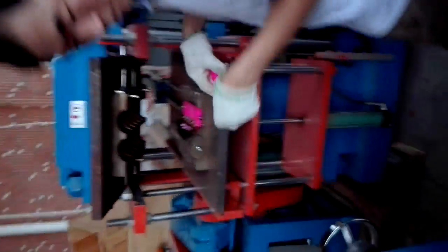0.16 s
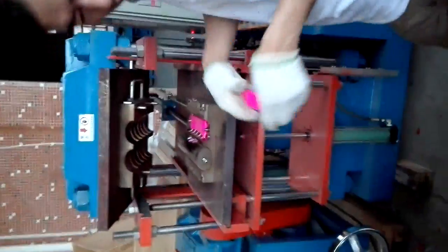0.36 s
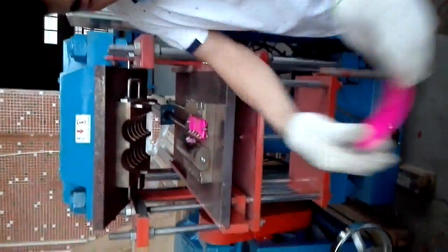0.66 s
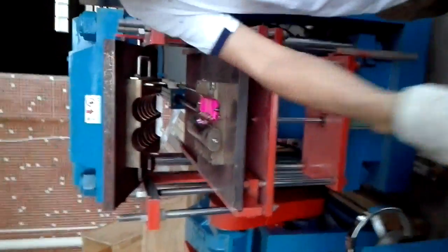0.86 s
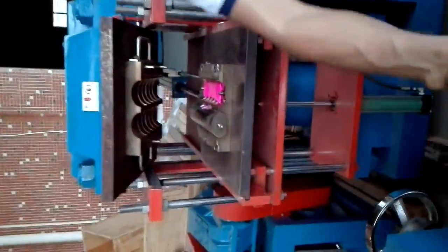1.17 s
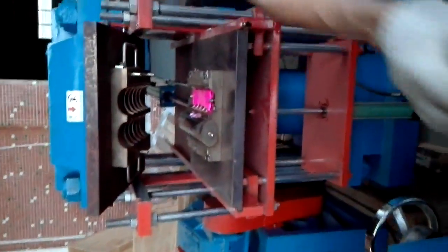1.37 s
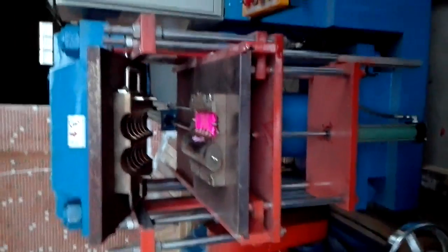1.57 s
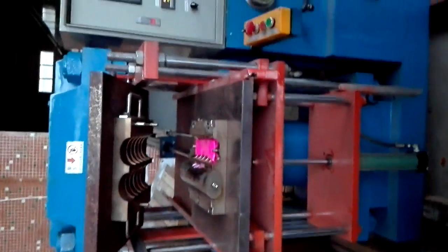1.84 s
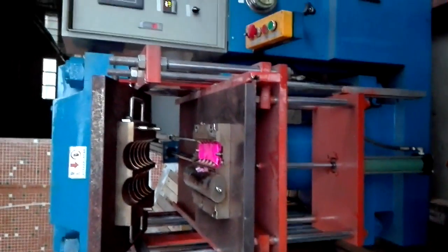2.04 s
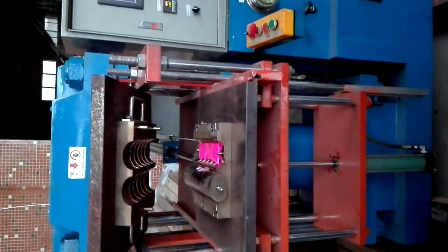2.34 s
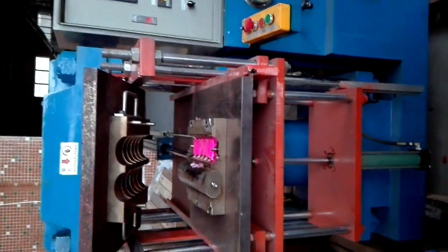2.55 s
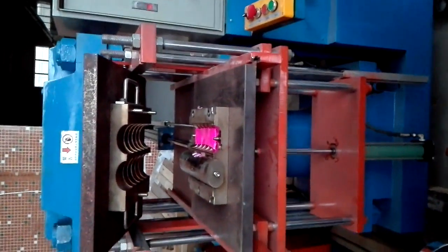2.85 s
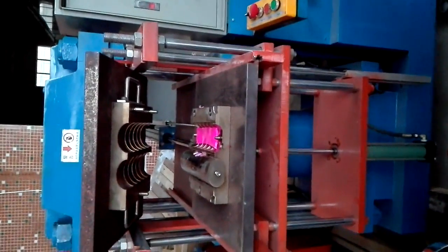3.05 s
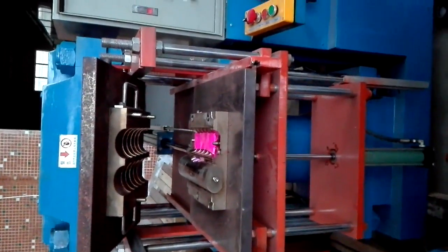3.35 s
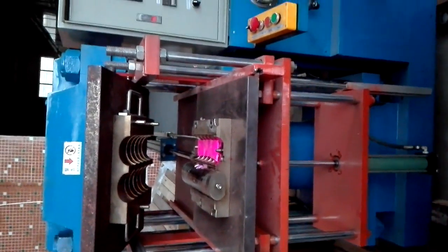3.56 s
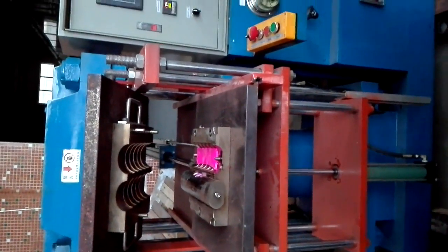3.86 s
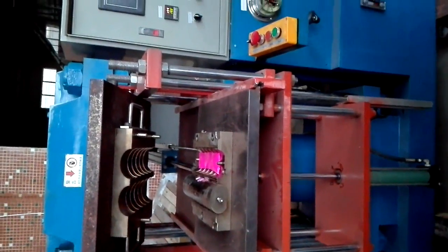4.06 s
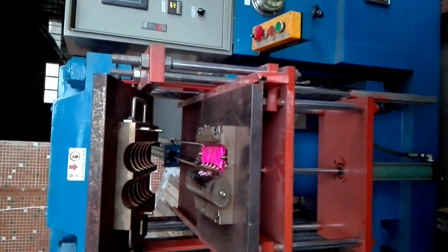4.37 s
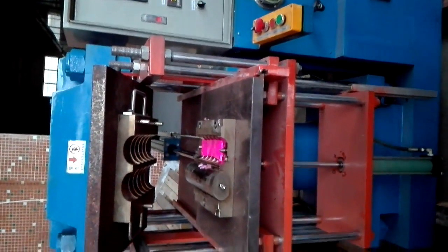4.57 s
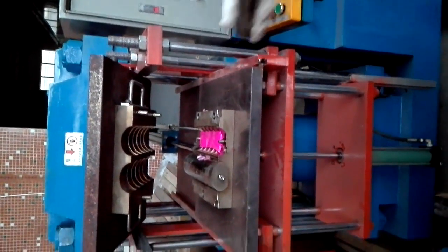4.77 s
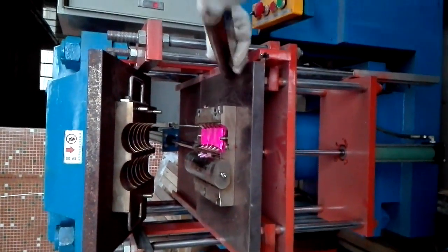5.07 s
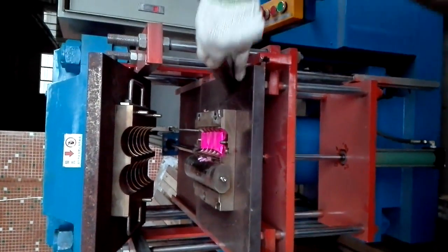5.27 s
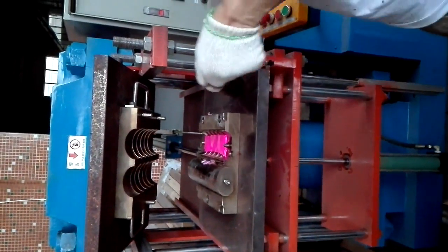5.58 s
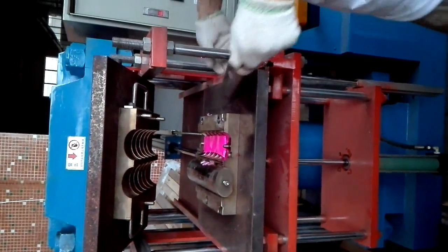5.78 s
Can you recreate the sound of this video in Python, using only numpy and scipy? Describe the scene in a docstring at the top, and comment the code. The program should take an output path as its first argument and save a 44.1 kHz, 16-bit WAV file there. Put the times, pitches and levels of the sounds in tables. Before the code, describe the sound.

Close handheld capture beside a press in a reverberant workshop: deep hum and dull air, faint handling clicks, a low rubbery bump, then one dominant steel clatter with several rapid contacts ringing about half a second. Afterwards a light tap, soft scuffs and two duller knocks, the last with a bright tick.

```python
"""Factory hall: a worker handles the steel parts of a press mould while a motor hums.
A heavy piece lands flat with a clang: steel and bench modes, noise-burst cracks and clatter.
Light knocks and a footfall (noise bursts), soft scuffs (gated noise) and a hollow bump (decaying
low sines) surround it; a hiss hangs on after the clang. Blows die away in hall echoes; motor lines,
whines and air run underneath."""
import sys
import numpy as np
from scipy import signal
from scipy.fft import rfft, irfft, next_fast_len
from scipy.io import wavfile
from scipy.ndimage import map_coordinates

SR = 44100
rng = np.random.default_rng(int(sys.argv[2]) if len(sys.argv) > 2 else 0)


def store_pcm(level_fs):
    """Save levels as 16-bit WAV."""
    pcm = np.round(np.clip(level_fs, -1, 1) * 32767).astype(np.int16)
    wavfile.write(sys.argv[1], SR, np.atleast_2d(pcm).T)


N = 260939
TIME = np.arange(N) / SR


def from_db(db):
    """Decibels to gain."""
    return 10 ** (np.asarray(db) / 20)


def rms_one(x):
    """Scale to rms 1."""
    return x / np.sqrt(np.mean(x ** 2) + 1e-20)


def at_hz(points, hz):
    """Read a curve on a log-frequency axis."""
    point_hz, value = np.transpose(points)
    return np.interp(np.log(hz), np.log(point_hz), value)


# left-right likeness: freq_hz, likeness_0_to_1
LIKENESS = [(3500, 1), (4500, .96), (6000, .79), (9000, .66), (13000, .85)]


def noise(spectrum, size=N):
    """Stereo noise of a given colour, alike in both channels except in the treble; rms 1."""
    length = next_fast_len(size, True)
    hz = np.maximum(np.fft.rfftfreq(length, 1 / SR), 1)
    mid, side = rfft(rng.standard_normal((2, length)))
    alike = np.clip(at_hz(LIKENESS, hz), 0, 1)
    both = np.sqrt(1 + alike) * mid + np.sqrt(1 - alike) * side * [[1], [-1]]
    coloured = both * from_db(at_hz(spectrum, hz))
    return rms_one(irfft(coloured, length)[:, :size])


def drift(turns_per_s):
    """Smooth random curve through about `turns_per_s` random knots a second; rms 1."""
    knots = rng.standard_normal(1024)
    coarse_s = TIME[::64]
    curve = map_coordinates(knots, [coarse_s * turns_per_s], mode="wrap")
    return rms_one(np.interp(TIME, coarse_s, curve))


def soften(x, cut_hz):
    """First-order low-pass: a softer contact carries less treble."""
    low_pass = signal.butter(1, min(cut_hz, .45 * SR), fs=SR, output="sos")
    return signal.sosfilt(low_pass, x)


def fade(rise_s, t60_s):
    """One second of a build-up and an exponential decay."""
    t = TIME[:SR]
    return (1 - np.exp(-t / rise_s)) * np.exp(-np.log(1000) * t / t60_s)


def burst(spectrum, rise_s, t60_s):
    """A crowd of short-lived modes struck at once, as decaying noise."""
    return noise(spectrum, size=SR) * fade(rise_s, t60_s)


def ringing(modes, scatter_db):
    """Sum of decaying modes; each blow draws new phases and scatters the levels by scatter_db."""
    t = TIME[:SR]
    out = np.zeros(SR)
    for hz, db, t60_s in modes:
        size, turn = rng.standard_normal(2)
        tone = np.sin(2 * np.pi * (hz * t + turn))
        out += from_db(db + scatter_db * size) * tone * fade(0.00088, t60_s)
    return out


def add(out, start_s, sound):
    """Mix a sound in at start_s."""
    start = int(start_s * SR)
    out[:, start:start + sound.shape[-1]] += sound[..., :N - start]


# ring time of the hall: freq_hz, t60_s
HALL_T60 = [(100, 1), (400, 1), (1000, 0.98), (2000, 1), (4000, 1), (8000, 0.54), (14000, 0.47)]


def hall(x, wet_db, treble_db, build_s):
    """Diffuse echoes in octave bands; the treble starts at its own level and dies sooner."""
    echoes = rfft(noise([(20, 0), (20000, 0)], size=SR))
    hz = np.maximum(np.fft.rfftfreq(SR, 1 / SR), 1)
    response = 0
    for centre_hz in 62.5 * 2.0 ** np.arange(9):
        share = np.maximum(1 - np.abs(np.log2(hz / centre_hz)), 0)
        gain = from_db(wet_db + treble_db * (centre_hz > 3000))
        tail = fade(build_s, at_hz(HALL_T60, centre_hz))
        response = response + gain * irfft(echoes * share) * tail / np.linalg.norm(tail)
    return signal.fftconvolve(x, response, axes=-1)[:, :N]


# hall air spectrum: freq_hz, density_db_per_hz
AIR = [(20, 0), (32, 8), (75, 2), (130, 0.5), (220, -5.5), (320, -9), (450, -18.5), (650, -22),
       (1050, -18.5), (1700, -26.5), (2400, -34.5), (4000, -29), (6500, -24), (9500, -38.5), (14000, -48.5)]
AIR_DB, AIR_WANDER_DB, AIR_TURNS_PER_S = -47, -0.81, 9.2


def hall_air():
    """Broadband noise with a slightly wandering level."""
    return from_db(AIR_DB + AIR_WANDER_DB * drift(AIR_TURNS_PER_S)) * noise(AIR)


# far machines' spectrum: freq_hz, density_db_per_hz
FAR_WORK = [(400, -44), (700, -7), (1050, 1.5), (1500, -4), (2100, -14.5), (4000, -49)]
FAR_WORK_DB, FAR_WORK_SWING_DB, FAR_WORK_TURNS_PER_S = -65, 4, 4.78


def far_machines():
    """Midrange noise that swells and sinks."""
    return from_db(FAR_WORK_DB + FAR_WORK_SWING_DB * drift(FAR_WORK_TURNS_PER_S)) * noise(FAR_WORK)


# other machines' thin whines: middle_s, half_length_s, pitch_hz, phase_turns_per_s, level_db
WHINES = [(2.994, 0.094, 1370, 167.6, -54.5), (4.75, 0.38, 1908, 50.04, -63.5)]
WHINE_FADING_DB, WHINE_FADES_PER_S, WHINE_ROUGH_DB = -1.5, 21, 3


def whines():
    """Sines with jittering phase and rough, fading level under bell-shaped envelopes."""
    out = np.zeros(N)
    for middle_s, half_s, hz, phase_turns_per_s, db in WHINES:
        tone = np.sin(2 * np.pi * hz * TIME + 1.8 * drift(phase_turns_per_s))
        rough_db = WHINE_ROUGH_DB * drift(2 * phase_turns_per_s)
        fading_db = WHINE_FADING_DB * drift(WHINE_FADES_PER_S)
        bell = np.exp(-.5 * ((TIME - middle_s) / half_s) ** 2)
        out += from_db(db + rough_db + fading_db) * bell * tone
    return out


# motor lines: freq_hz, rms_db_unscreened, waver_0_to_1, loss_db_fully_screened
MOTOR = [(48.8, -37.5, 0.15, 1), (149.5, -61.5, 0.8, 0), (294, -52, 0.04, 16.5), (410, -71, 1, 17)]
SCREENING_LEFT, STEP_ASIDE_S = 0.37, 1  # share 0-1, time constant


def motor():
    """Wavering lines; the worker's body screens them at first, then moves partly aside."""
    out = np.zeros(N)
    screened = SCREENING_LEFT + (1 - SCREENING_LEFT) * np.exp(-TIME / STEP_ASIDE_S)
    for hz, db, waver, lost_db in MOTOR:
        swing = 1 + waver * (drift(22) + 1j * drift(11))  # amplitude and phase
        line = np.real(swing * np.exp(2j * np.pi * hz * TIME))
        out += from_db(db - lost_db * screened) * rms_one(line)
    return out


# soft scuffs, and a hiss that hangs on after the clang: start_s, length_s, rub_db, hiss_db
SCUFFS = [(0.128, 0.029, -59.5, -74), (0.41, 0.091, -58, -78), (1.756, 0.02, -68, -75),
          (2.206, 0.054, -59, -66), (2.737, 0.048, -70, -60), (3.161, 0.047, -57.5, -60.5),
          (3.306, 0.27, -57.5, -47), (4.263, 0.041, -49.5, -60), (4.878, 0.035, -61, -66),
          (5.44, 0.051, -59.5, -77), (5.669, 0.18, -69, -51.5)]
# rub spectrum, also used for clicks: freq_hz, density_db_per_hz
RUB = [(300, -28), (800, -1.5), (1400, -3), (2000, 1), (2700, -9), (3400, -3.5), (4600, -29), (12000, -29)]
# fine hiss spectrum: freq_hz, density_db_per_hz
HISS = [(2000, 1.5), (4500, 1.5), (6500, 4), (9000, -2), (13500, -10.5)]
STROKE_ATTACK_S, STROKE_RELEASE_S = 0.0072, 0.088
RUSTLE_DB, RUSTLE_SWING_DB, RUSTLES_PER_S = -74.5, -6, 5.4  # faint rustle throughout


def scuffs():
    """Soft rubs and hisses, mostly short; the rub catches unevenly, the hiss is smoother."""
    rub = hiss = from_db(RUSTLE_DB + RUSTLE_SWING_DB * drift(RUSTLES_PER_S))
    for start_s, length_s, rub_db, hiss_db in SCUFFS:
        attack = np.clip((TIME - start_s) / STROKE_ATTACK_S, 0, 1)
        release = np.exp(-np.maximum(TIME - start_s - length_s, 0) / STROKE_RELEASE_S)
        stroke = attack * release
        rub = np.hypot(rub, from_db(rub_db) * stroke)
        hiss = np.hypot(hiss, from_db(hiss_db) * stroke)
    catching = drift(130)
    rubbing = from_db(1.85 * catching) * rub * noise(RUB)
    hissing = from_db(1.6 * catching) * hiss * noise(HISS)
    return rubbing + hissing


# hollow rubbery bump modes: freq_hz, level_db, rise_s, t60_s
BUMP = [(168, -3.5, 0.031, 0.086), (176.4, -35, 0.01, .9), (237, -17, 0.0061, 0.067),
        (660, -41.5, 0.01, 0.19)]
# knock body spectrum, also used by light knocks: freq_hz, density_db_per_hz
KNOCK = [(150, -7.5), (300, -14), (420, -3), (560, -6), (720, -6.5), (900, -2), (1500, 0.5), (2000, -7),
         (2900, -11), (3900, -19.5), (9000, -52)]
BUMP_S = 2.514


def bump():
    """A soft blow swells into a few low cycles, with a faint dull knock and a faint ring."""
    out, t = np.zeros((2, N)), TIME[:SR]
    soft_onset = 1 - np.exp(-t / 0.0062)
    for hz, db, rise_s, t60_s in BUMP:
        tone = -np.sin(2 * np.pi * hz * t)
        add(out, BUMP_S, from_db(db) * tone * fade(rise_s, t60_s) * soft_onset)
    add(out, BUMP_S, from_db(-38.5) * soften(burst(KNOCK, 0.014, 0.34), cut_hz=930))
    return out + hall(out, wet_db=-19.5, treble_db=0, build_s=0.012)


# knocks and a footfall: start_s, body_db, thud_db, tick_db, body_t60_s
KNOCKS = [(0.7161, -38, -40, -41.5, 0.41), (1.2720, -41, -60, -52.5, 0.34), (4.285, -43, -38.5, -57, 0.081),
          (5.4255, -26, -36, -70, 0.13), (5.7624, -26, -34.5, -32.5, 0.11)]
# tick spectrum: freq_hz, density_db_per_hz
TICK = [(2000, -28), (4500, -0.5), (6500, 12), (9000, 1.5), (11500, -3.5), (13500, -1.5)]
# thud spectrum: freq_hz, density_db_per_hz
THUD = [(50, -18), (85, -15), (122, 8.5), (170, -3.5), (225, -2.5), (300, -11), (410, -10.5), (600, -19.5),
        (1500, -56)]
# small clicks of things handled: start_s, level_db
CLICKS = [(.4667, -41), (.476, -45), (.4986, -41.5), (.5111, -39.5), (1.239, -47)]
KNOCK_CUT_HZ, KNOCK_RISE_S = 1420, 0.0032
CLICK_RISE_S, CLICK_T60_S = 0.00038, 0.013


def light_knocks():
    """Light knocks and a footfall: bright tick, short body, slower thud; the clicks are one burst."""
    out = np.zeros((2, N))
    for start_s, body_db, thud_db, tick_db, t60_s in KNOCKS:
        body = from_db(body_db) * soften(burst(KNOCK, KNOCK_RISE_S, t60_s), KNOCK_CUT_HZ)
        tick = from_db(tick_db) * burst(TICK, 0.00024, 0.088)
        thud = from_db(thud_db) * burst(THUD, 0.0058, 0.62)
        add(out, start_s, body + tick + thud)
    for start_s, db in CLICKS:
        add(out, start_s, from_db(db) * burst(RUB, CLICK_RISE_S, CLICK_T60_S))
    return out + hall(out, wet_db=-7.5, treble_db=1.0, build_s=0.007)


# heavy piece contacts: start_s, strength_db, clatter_db, thud_db, contact_cut_hz, spot_hz
LANDINGS = [(3.2850, -35.5, -11.5, -22.5, 1410, 2620), (3.2945, -34, -27, -43, 2480, 2680),
            (3.3120, -49, -19, -35, 2512, 2664), (3.3539, -17, -15.5, -28, 3440, 2170),
            (3.4360, -28, -27, -30.5, 1110, 1300), (3.4636, -57, -27, -39, 2500, 1800)]
# heavy piece modes: freq_hz, level_db, t60_s
STEEL = [(653, -18, .5), (806, -14, .8), (846, -10, .3), (887, -15, .5), (975, -14, .45), (1136, -16, .35),
         (1279, 1, .38), (1386, -13, .5), (1433, -14, .6), (1473, -8, .5), (1550, -10, .58),
         (1605, -14, .7), (1770, -12, .45), (1803, 1.5, .42), (1836, -9, .45), (1892, -9, .5),
         (2157, -1, .22), (2626, -11, .3), (2941, -13, .3), (3620, -23, .3)]
# modes of the bench under it: freq_hz, level_db, t60_s
BENCH = [(122.5, -9.5, 0.9), (158, 3, 0.29), (220.3, 5, 0.089), (264, 1, 0.16), (278, -4, 0.057),
         (334.3, -14.5, 0.38), (499.6, -9.5, 0.54)]
# contact crack spectrum: freq_hz, density_db_per_hz
CRACK = [(400, -24), (1100, -2), (2000, 14), (2500, -2.5), (3000, -2), (5000, -22), (9000, -55),
         (14000, -57)]
# clatter spectrum: freq_hz, density_db_per_hz
CLATTER = [(200, -6), (450, -11), (720, -8.5), (850, 3), (1300, 0), (1800, 4), (2100, -13.5), (2700, -10),
           (3600, -14), (4300, -19.5), (6500, -20), (9000, -23.5), (14000, -42)]
# SPOT_DB and CRACK_DB are relative to contact strength
SPOT_DB, SPOT_T60_S = 5, 0.14
CRACK_DB, CRACK_T60_S = 1.5, .045
# harder contacts clatter longer: t60 at 0 dB, strength step that doubles it
CLATTER_T60_S, CLATTER_DOUBLING_DB = 0.65, 17


def heavy_piece():
    """One edge lands and stutters, the piece slaps flat and rocks; contacts ring steel and bench."""
    rings, clatter = np.zeros((2, N)), np.zeros((2, N))
    for start_s, db, clatter_db, thud_db, cut_hz, spot_hz in LANDINGS:
        steel = from_db(db) * soften(ringing(STEEL, scatter_db=0.0), cut_hz)
        bench = from_db(thud_db) * ringing(BENCH, scatter_db=-0.8)
        # brief resonance of the struck spot
        spot_spectrum = [(spot_hz / 2, -50), (spot_hz / 1.1, -14), (spot_hz, 0),
                         (spot_hz * 1.1, -14), (spot_hz * 2, -50)]
        spot = from_db(db + SPOT_DB) * burst(spot_spectrum, 0.000211, SPOT_T60_S)
        crack = from_db(db + CRACK_DB) * burst(CRACK, 0.0002, CRACK_T60_S)
        add(rings, start_s, steel + bench + spot + crack)
        t60_s = CLATTER_T60_S * 2 ** (db / CLATTER_DOUBLING_DB)
        rattle = soften(burst(CLATTER, 0.0024, t60_s), cut_hz)
        add(clatter, start_s, from_db(clatter_db) * rattle)
    to_hall = clatter + from_db(-15) * rings
    return rings + clatter + hall(to_hall, wet_db=-5.5, treble_db=2.5, build_s=0.0023)


def scene():
    """Scuffs, knocks and the clang over the running machinery."""
    machinery = hall_air() + far_machines() + whines() + motor()
    return machinery + scuffs() + bump() + light_knocks() + heavy_piece()


CUTOFF_HZ = 14450


def record(dry):
    """The sound eases in, peaks are rounded and the top is cut."""
    ease_in = np.minimum(TIME / .004, 1)
    rounded = 1.339 * np.tanh(ease_in * dry / 1.252)
    top_cut = signal.ellip(12, .1, 90, CUTOFF_HZ, fs=SR, output="sos")
    return signal.sosfilt(top_cut, rounded)


dry = scene()
out = record(dry)
store_pcm(out)
```